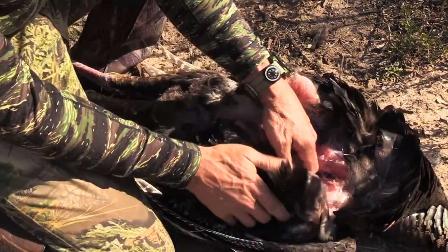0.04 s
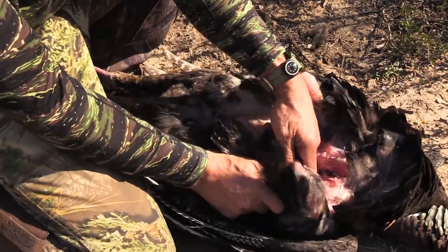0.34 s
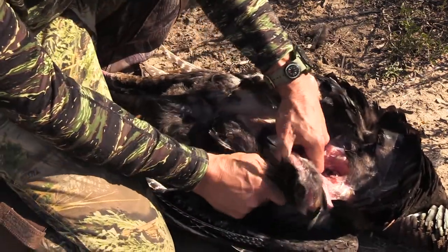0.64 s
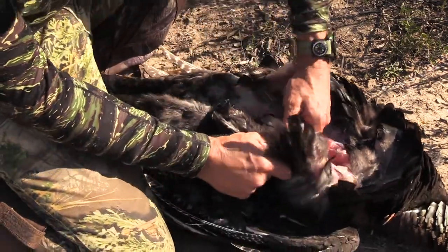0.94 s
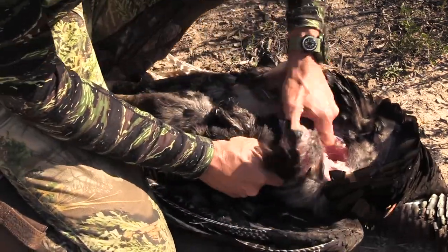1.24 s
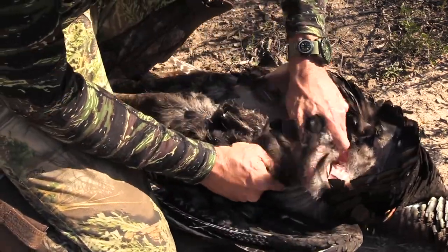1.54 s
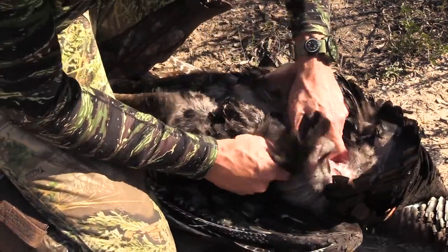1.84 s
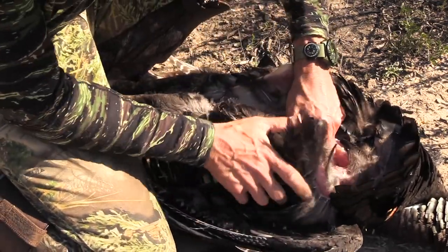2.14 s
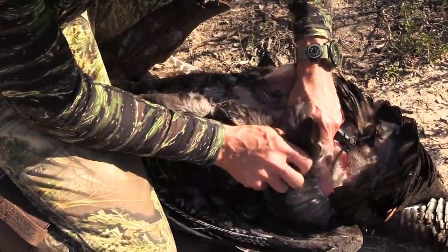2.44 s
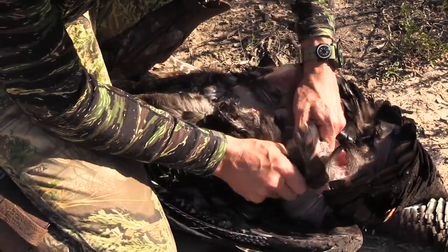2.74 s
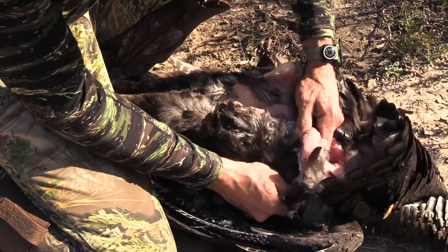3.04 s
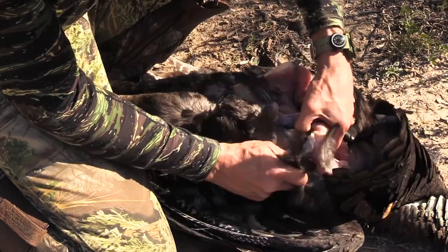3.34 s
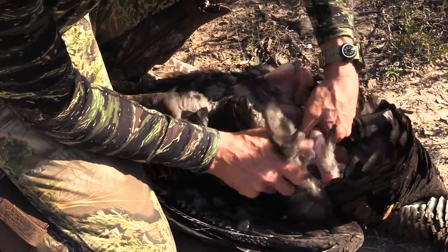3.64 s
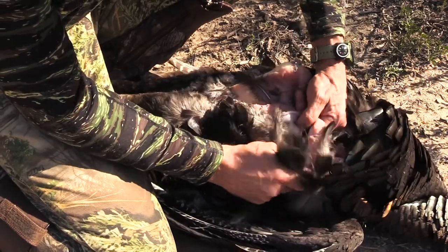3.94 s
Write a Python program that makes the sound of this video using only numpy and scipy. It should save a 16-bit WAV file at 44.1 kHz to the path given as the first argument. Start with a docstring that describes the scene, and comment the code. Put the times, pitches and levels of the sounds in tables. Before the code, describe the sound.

Feathers swish and crackle softly, close by, as hands pull the skin off a bird carcass. Tissue pops several times around 0.5 seconds, and a quill clicks near 1 second. Lighter ticks follow until one stiff part snaps sharply at about 3 seconds. Wind rumbles on the microphone throughout over a faint outdoor hiss, gusting hardest from 3.1 to 3.5 seconds as the rustling picks up again.

```python
"""Feathers swish and crackle as hands pull the skin off a turkey carcass, outdoors, close to the mic.
Each pull is rubbing noise plus slipping barbs; splitting vanes add short bursts of bright clicks.
Quills tick, tissue pops and one stiff part snaps sharply, each a damped ring with brief reflections.
Wind rumbles on the microphone and gusts just after the snap, over a faint outdoor hiss."""
import sys
import numpy as np
from scipy import signal
from scipy.fft import rfft, irfft
from scipy.io import wavfile
from scipy.ndimage import uniform_filter1d

SR = 44100
rng = np.random.default_rng(int(sys.argv[2]) if len(sys.argv) > 2 else 0)


def dump_mix(stems):
    """Bounce the given channels to the path in sys.argv[1] as a 16-bit WAV at rate SR."""
    frames = np.atleast_2d(stems).T  # one column per channel
    limited = np.clip(frames, -1, 1)  # hard clip at full scale
    pcm = np.round(limited * 32767).astype(np.int16)
    wavfile.write(sys.argv[1], SR, pcm)


N = 176400
TIME_S = np.arange(N) / SR
TAPS = 4096
BINS_HZ = np.fft.rfftfreq(TAPS, 1 / SR) + 1

# pulls through the feathers (centre [s], length [s], level [dB], tilt [dB/oct])
PULL_EVENTS = [(0.025, 0.13, -51, 0), (0.194, 0.12, -52.5, -8), (0.348, 0.27, -57, 2),
               (0.646, 0.12, -54.5, -4), (0.787, 0.098, -48, 1), (0.881, 0.032, -52, 1),
               (0.998, 0.14, -52, 1.5), (1.142, 0.11, -47.5, -0.5), (1.277, 0.15, -53.5, 4),
               (1.446, 0.056, -51.5, 1), (1.493, 0.041, -50.5, 0.5), (1.582, 0.034, -55.5, 6),
               (2.017, 0.036, -54, 5), (2.15, 0.16, -59, -2), (2.877, 0.12, -62, 0), (3.112, 0.13, -54, -3),
               (3.289, 0.081, -52, 0), (3.36, 0.058, -51, -11), (3.512, 0.2, -53, -5.5),
               (3.73, 0.16, -54, -4.5)]
# feather swish (frequency [Hz], level [dB])
SWISH_SPECTRUM = [(150, -14), (500, -2.5), (900, 0), (1500, 0), (2300, 0), (3700, -2.5), (4900, -9.5),
                  (6200, -14.5), (8500, -18), (10500, -31), (16000, -40)]
# crackle of handled feathers (time [s], level [dB])
CRACKLE_ENVELOPE = [(0, -64), (.37, -60.5), (.5, -68), (.8, -58), (1.2, -66), (1.6, -63), (2.05, -65),
                    (2.3, -70), (2.7, -69), (3.1, -62), (3.35, -61), (3.6, -69), (3.8, -61.5), (4, -63)]
# dry feather crackle (frequency [Hz], level [dB])
CRACKLE_SPECTRUM = [(300, -25), (1200, 8.5), (2500, -1.5), (4200, 4), (6000, -12), (8300, -3.5),
                    (10500, -16.5), (13000, -8), (16000, -15)]
# vanes splitting (time [s], level [dB])
SPLIT_EVENTS = [(0.783, -52), (1.129, -54), (1.572, -56), (3.716, -52), (3.737, -55.5), (3.823, -53.5),
                (3.843, -48), (3.907, -55.5)]
# fizz of a split (frequency [Hz], level [dB])
SPLIT_SPECTRUM = [(1500, -16), (4200, 3), (8300, 0), (12500, -6), (16000, -14)]
# quill ticks (time [s], pitch [Hz], level [dB], width [oct])
QUILL_TICKS = [(0.058, 3460, -32.5, 0.85), (0.1420, 3000, -33, 0.53), (0.1592, 1910, -27, 2),
               (0.165, 3500, -30, 2.4), (0.63, 4750, -24.5, 0.53), (0.631, 8250, -35, 0.19),
               (0.6580, 7000, -37, .7), (0.7152, 2650, -24.5, 1.14), (0.7550, 3120, -30, .45),
               (0.8881, 2660, -29.5, 1), (0.9611, 3670, -16, .85), (0.991, 4600, -32.5, 0.49),
               (1.088, 7000, -32.5, .9), (1.546, 2480, -32.5, 0.69), (1.583, 2300, -33, 1.4),
               (1.6012, 3500, -37, 1.5), (1.743, 3000, -35.5, 1), (1.9037, 2800, -34.5, 1.3),
               (2.0197, 1900, -34.5, .6), (2.0340, 3750, -31.5, 0.42), (2.034, 6300, -34.5, 0.42),
               (2.1068, 1600, -30, 1.3), (2.6018, 1600, -34, 2.4), (2.8435, 2900, -28.5, 0.91),
               (2.8555, 2800, -31, 0.84), (2.8979, 2490, -33, 1.6), (2.9738, 2410, -18.5, 0.74),
               (2.9961, 2900, -22.5, 1.5), (3.1295, 7500, -40, .9), (3.3643, 4200, -28.5, 1.4),
               (3.5840, 4700, -41.5, .3), (3.6843, 3950, -33.5, 0.39), (3.7365, 2200, -37.5, .7),
               (3.9672, 3900, -40, .7)]
# skin letting go, plus one short scrape at 0.435 s (time [s], pitch [Hz], level [dB], width [oct], relative
# flesh knock [dB])
SKIN_POPS = [(0.1770, 805, -37.5, .5, 1), (0.1900, 690, -36.5, .5, -4), (0.4350, 950, -38, .6, -8),
             (0.4488, 1100, -31, .9, -3), (0.4958, 1480, -17.5, 0.33, -6), (0.5504, 1745, -20, 0.18, -4),
             (0.5500, 2780, -24, 0.68, -13), (0.5775, 1000, -33, .5, -9), (0.5809, 393, -32, .7, -18),
             (0.6026, 1040, -33, 0.56, -17), (0.6170, 1190, -30.5, 0.7, -10), (2.1157, 1600, -40, .5, -12)]
# dull knock of the flesh (frequency [Hz], level [dB])
FLESH_SPECTRUM = [(120, -18), (300, -6), (450, -11), (600, -1), (740, 4.5), (900, -3), (1150, -15),
                  (4000, -33), (12000, -42)]
# ring of the snap (frequency [Hz], level [dB])
SNAP_SPECTRUM = [(100, -40), (500, -23), (900, -24), (1300, -14), (1600, -5.5), (1860, 0.5), (2250, -4.5),
                 (2900, -12.5), (3500, -12), (4300, -29.5), (5200, -29), (6200, -41), (7600, -35.5),
                 (9500, -53), (16000, -52)]
# wind on the microphone (time [s], level [dB])
WIND_ENVELOPE = [(0.0, -48), (0.03, -43.5), (0.17, -51.5), (0.38, -37.5), (0.445, -34), (0.48, -50),
                 (0.72, -46.5), (1.27, -35.5), (1.48, -33.5), (1.68, -44), (1.92, -51.5), (1.97, -44.5),
                 (2.04, -46), (2.42, -38.5), (2.58, -50.5), (2.65, -42), (2.83, -42.5), (2.94, -32.5),
                 (2.99, -37.5), (3.03, -28), (3.07, -37.5), (3.105, -24.5), (3.16, -20.5), (3.2, -31.5),
                 (3.235, -20.5), (3.3, -22), (3.35, -27.5), (3.385, -20.5), (3.43, -29), (3.53, -25),
                 (3.6, -34.5), (3.69, -32), (3.72, -27), (3.76, -33.5), (4.0, -33)]
# light breeze (frequency [Hz], level [dB])
BREEZE_SPECTRUM = [(15, -28), (30, -9.5), (60, -2.5), (120, 0), (190, -0.5), (260, -7), (350, -15),
                   (520, -25), (900, -32), (2000, -59)]
# full gust (frequency [Hz], level [dB])
GUST_SPECTRUM = [(15, -25), (30, -13), (65, 1.5), (120, 1), (200, -1.5), (280, -6), (400, -14.5),
                 (600, -23.5), (1000, -38), (2000, -72)]
# outdoor hiss (frequency [Hz], level [dB])
AIR_SPECTRUM = [(40, 0), (250, -3), (500, -1.5), (1000, -4), (2000, -11), (3500, -16), (5500, -21),
                (8500, -22.5), (10500, -24), (16000, -26)]


def amp(db):
    """Decibels to gain."""
    return 10 ** (np.asarray(db) / 20)


def unit_rms(x):
    """Scales to unit rms."""
    return x / np.sqrt(np.mean(x ** 2) + 1e-20)


def spectrum_db(spectrum, hz):
    """Interpolates a spectrum on a log-frequency axis."""
    points_hz, db = np.transpose(spectrum)
    return np.interp(np.log(hz + 1), np.log(points_hz), db)


def add(mix, start_s, sound):
    """Mixes a sound in at start_s."""
    part = mix[max(round(start_s * SR), 0):][:len(sound)]
    part += sound[:len(part)]


def coloured(x, spectrum, tilt_db_per_oct=0, pivot_hz=2800):
    """Applies a spectrum and a tilt; unit rms."""
    hz = np.fft.rfftfreq(len(x), 1 / SR)
    gain = amp(spectrum_db(spectrum, hz) + tilt_db_per_oct * np.log2(hz / pivot_hz + .1))
    return unit_rms(irfft(rfft(x) * gain, len(x)))


def ring(gain, allpass_hz=2000):
    """Causal impulse response of a gain curve, peak 1; lows lag highs slightly."""
    cepstrum = irfft(np.log(np.maximum(gain / gain.max(), 1e-5)))
    cepstrum[1:TAPS // 2] *= 2  # fold to minimum phase
    cepstrum[TAPS // 2 + 1:] = 0
    lag_rad = 2 * np.arctan(BINS_HZ / allpass_hz)
    wave = irfft(np.exp(rfft(cepstrum) - 1j * lag_rad))[:TAPS // 2]
    return wave / abs(wave).max()


def resonance(hz, width_oct, skirt):
    """Gain curve of one damped resonance."""
    detuning = (BINS_HZ / hz - hz / BINS_HZ) / (width_oct * np.log(2))
    return (1 + detuning ** 2) ** (-skirt / 2)


def scattered(wave, level_db, t60_s):
    """Adds brief reflections off the ground and the carcass."""
    t = TIME_S[:TAPS]
    onset = np.minimum(t / .001, 1) ** 2
    spray = rng.standard_normal(TAPS) * np.exp(-np.log(1000) * t / t60_s) * onset
    spray *= amp(level_db) / np.linalg.norm(spray)
    spray[0] = 1  # direct path
    return signal.fftconvolve(wave, spray)


def grains(rate_per_s, spread_db):
    """Random tiny clicks, a few larger than the rest; unit rms."""
    size = amp(spread_db * np.minimum(rng.exponential(1, N), 4))
    return unit_rms(size * rng.choice([-1, 1], N) * (rng.random(N) < rate_per_s / SR))


def feather_swish(barb_share=.8):
    """Each pull swells and fades: smooth rubbing plus barbs slipping past each other."""
    rubbing = np.sqrt(1 - barb_share) * rng.standard_normal(N)
    barbs = np.sqrt(barb_share) * grains(rate_per_s=900, spread_db=3.2)
    out = np.zeros(N)
    for centre_s, length_s, db, tilt_db_per_oct in PULL_EVENTS:
        swell = amp(db) * np.exp(-2 * ((TIME_S - centre_s) / length_s) ** 2)
        out += swell * coloured(rubbing + barbs, SWISH_SPECTRUM, tilt_db_per_oct)
    return out


def feather_crackle(rate_per_s=170, sizes=8):
    """Dry barbs click sparsely when handled, each size at its own pitch."""
    clicks = np.zeros(N)
    for hz in np.geomspace(1400, 11000, sizes):
        barb = unit_rms(ring(resonance(hz, width_oct=0.59, skirt=1.76))) * np.sqrt(hz)
        clicks += signal.oaconvolve(grains(rate_per_s / sizes, spread_db=2.6), barb)[:N]
    level_db = np.interp(TIME_S, *np.transpose(CRACKLE_ENVELOPE))
    return amp(level_db) * coloured(clicks, CRACKLE_SPECTRUM)


def vane_splits(length_s=.004):
    """A feather vane splits: a few milliseconds of tiny bright clicks."""
    bursts = sum(amp(db) * np.exp(-2 * ((TIME_S - s) / length_s) ** 2) for s, db in SPLIT_EVENTS)
    return bursts * coloured(grains(rate_per_s=2500, spread_db=1), SPLIT_SPECTRUM)


def quill_ticks(body_db=-13, cutoff_ratio=2.7, max_cutoff_hz=7900):
    """A quill flicks free and rings a few cycles, with some body from the skin; low ones are duller."""
    out = np.zeros(N)
    body = amp(body_db) * resonance(hz=1110, width_oct=1.7, skirt=2.8)
    for start_s, hz, db, width_oct in QUILL_TICKS:
        cutoff_hz = min(cutoff_ratio * hz, max_cutoff_hz)
        quill = resonance(hz, width_oct, skirt=1.92)
        tick = ring((quill + body) / np.hypot(1, (BINS_HZ / cutoff_hz) ** 2))
        add(out, start_s, amp(db) * scattered(tick, level_db=-9.5, t60_s=.016))
    return out


def skin_pops(cutoff_hz=5300):
    """Tissue lets go with a pop; the flesh under it gives a duller knock. A short scrape at 0.435 s sounds the
    same way."""
    out = np.zeros(N)
    for start_s, hz, db, width_oct, flesh_db in SKIN_POPS:
        pop = resonance(hz, width_oct, skirt=1.74) / np.hypot(1, (BINS_HZ / cutoff_hz) ** 2)
        knock = amp(flesh_db + spectrum_db(FLESH_SPECTRUM, BINS_HZ))
        add(out, start_s, amp(db) * scattered(ring(pop + knock), level_db=-14, t60_s=.012))
    return out


def snap(start_s=2.9783, gain_db=-0.5):
    """One stiff part gives way: a loud, heavily damped ring."""
    out = np.zeros(N)
    crack = ring(amp(spectrum_db(SNAP_SPECTRUM, BINS_HZ)))
    add(out, start_s, -amp(gain_db) * scattered(crack, level_db=-28, t60_s=.028))
    return out


def wind():
    """Turbulence on the microphone: deep rumble in quick buffets, a smoother, later rush above it."""
    breeze_db, gust_db = -32.5, -20.5
    buffet_hz, buffet_db = 20, 1.2
    crossover_hz, rush_db, rush_lag_s, rush_smooth_s = 372, 2.5, 0.031, 0.1
    level_db = np.interp(TIME_S, *np.transpose(WIND_ENVELOPE))
    smooth_db = uniform_filter1d(level_db, size=round(rush_smooth_s * SR))
    swell_db = np.interp(TIME_S - rush_lag_s, TIME_S, smooth_db)
    force = np.clip((swell_db - breeze_db) / (gust_db - breeze_db), 0, 1)
    eddies = rng.standard_normal(N)
    flow = (1 - force) * coloured(eddies, BREEZE_SPECTRUM) + force * coloured(eddies, GUST_SPECTRUM)
    rumble = irfft(rfft(flow) / (1 + (np.fft.rfftfreq(N, 1 / SR) / crossover_hz) ** 8), N)
    rush = flow - rumble
    rumble /= np.sqrt(uniform_filter1d(rumble ** 2, size=2400) + 1e-9)  # flatten short-term rms
    knots_s = np.arange(0, N / SR, 1 / (2 * buffet_hz))
    swings = np.diff(rng.standard_normal(len(knots_s) + 1))
    buffets = unit_rms(np.interp(TIME_S, knots_s, swings))
    return amp(level_db + buffet_db * buffets) * rumble + amp(swell_db + rush_db) * rush


def air(level_db=-51.5):
    """Steady outdoor hiss."""
    return amp(level_db) * coloured(rng.standard_normal(N), AIR_SPECTRUM)


def scene():
    """All sources at one microphone."""
    background = wind() + air()
    feathers = feather_swish() + feather_crackle() + vane_splits()
    return (feathers + quill_ticks() + skin_pops() + snap() + background)[None]


def record(dry):
    """The recorder's band limit."""
    cutoff_hz = 15900
    lowpass = signal.firwin(511, cutoff_hz, window=("kaiser", 9), fs=SR)
    return signal.oaconvolve(dry, lowpass[None], "same")


dry = scene()
out = record(dry)
dump_mix(out)
```